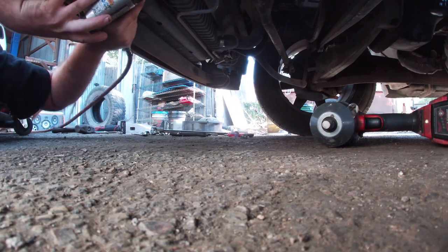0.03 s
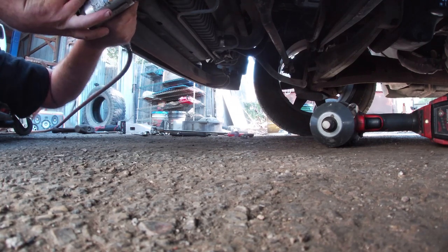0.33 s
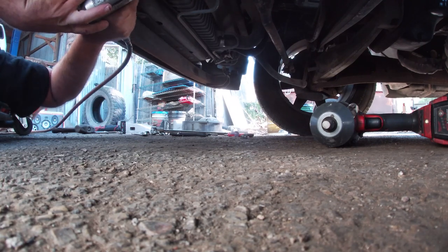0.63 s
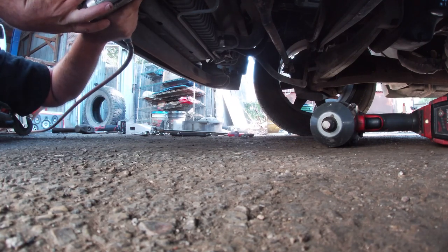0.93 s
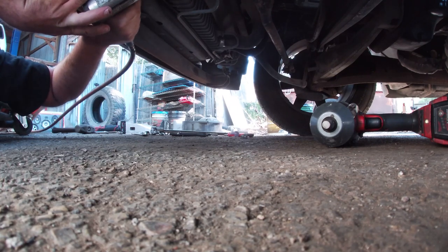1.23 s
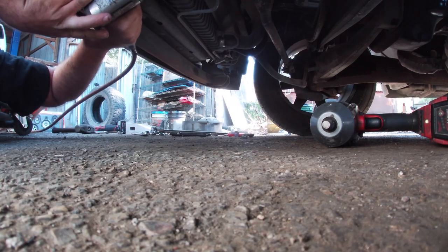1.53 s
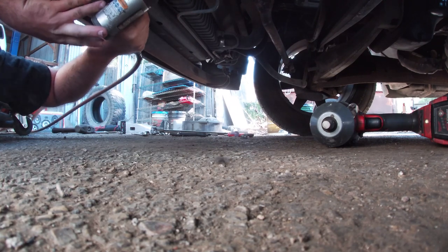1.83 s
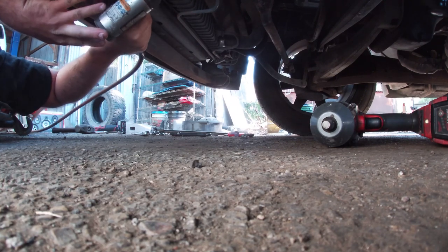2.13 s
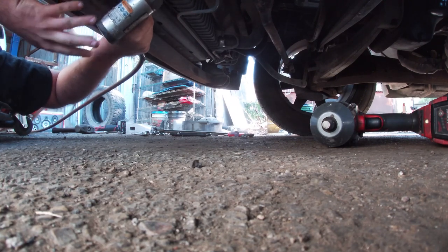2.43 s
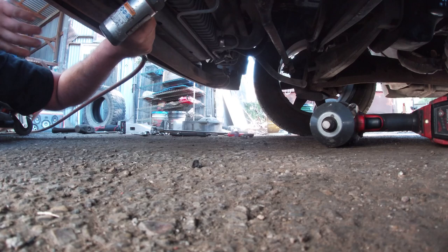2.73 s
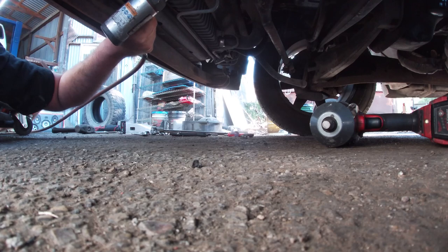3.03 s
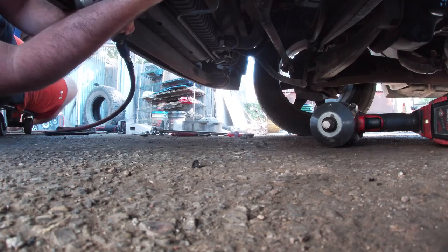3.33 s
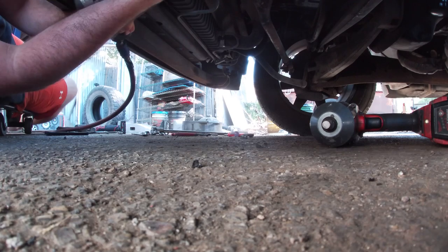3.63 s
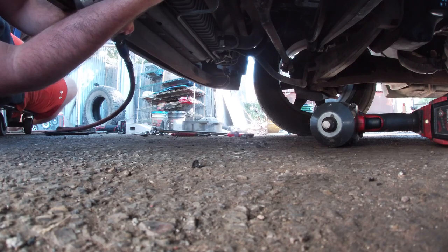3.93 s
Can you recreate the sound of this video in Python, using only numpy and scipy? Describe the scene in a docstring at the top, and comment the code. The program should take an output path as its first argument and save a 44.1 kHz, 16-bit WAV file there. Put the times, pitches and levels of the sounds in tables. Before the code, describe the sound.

Close up in a quiet workshop yard, an air hammer stutters four times with steel clanks and whistling air, then hammers without a break. Finally it presses into a car's underbody, losing the whistle and clattering faster.

```python
"""Under a car in a workshop yard, microphone on the ground, close to an air hammer.
Four short pulls of the trigger, then a long run. Each piston stroke blows a blast of air with a falling
whistle, then a return puff; around the short pulls the steel clanks. Late in the run the tool is pushed
up into the underbody: the whistle ends and the strokes become a faster, denser rattle."""
import sys
import numpy as np
from scipy import signal
from scipy.fft import rfft, irfft, next_fast_len
from scipy.io import wavfile
from scipy.ndimage import uniform_filter1d, minimum_filter1d, map_coordinates

SR = 44100
rng = np.random.default_rng(int(sys.argv[2]) if len(sys.argv) > 2 else 0)


def to_wav(s):
    """Save 16-bit WAV."""
    ch = np.atleast_2d(s).T  # columns
    pcm = np.round(np.clip(ch, -1, 1) * 32767)  # PCM
    wavfile.write(sys.argv[1], SR, pcm.astype(np.int16))


N = 176400
T = np.arange(N) / SR
AGE = T[:SR // 4]  # time since a stroke began [s]
PRESSED_S = 3.11  # the tool is pushed into the underbody
RETURN_LAG_S, SCATTER_DB = 0.01067, 0.66  # piston's return; spread between strokes
# modes of the car's panels (frequency [Hz], level [dB], t60 [s])
PANELS = [(137.6, 0, 0.5), (237, 5.5, 0.43), (355, -6, 0.35), (705, -4.5, 0.55), (955, -7, 0.65),
          (1190, -4, .3), (1470, -9, .7)]


def long_run():
    """Times and levels of the piston's strokes while the trigger is held."""
    # piston speed (time [s], rate [strokes/s])
    rate = [(1.623, 36.1), (1.9, 35.6), (2.05, 35.15), (2.35, 34.85), (2.55, 35.55), (2.72, 35.1),
            (2.85, 35.55), (3.1, 35.75), (3.12, 39.6), (3.6, 41), (4, 41.4)]
    t = T[T >= rate[0][0]]
    cycles = np.cumsum(at(rate, t)) / SR
    times = np.interp(np.arange(int(cycles[-1]) + 1), cycles, t)
    return times, SCATTER_DB * rng.standard_normal(len(times))


def exhaust(times, levels):
    """Each free stroke vents a blast and a return puff; both hiss and push the air under the car."""
    # strokes of the short pulls (time [s], blast [dB], return puff [dB], whistle [dB])
    pulls = [(0.5769, 1.5, -9, -13.5), (0.6169, -3, -25, -5), (0.8023, 1, 2.5, 2), (0.8404, 2.5, -5, 2.5),
             (.868, 2.5, -5, -4), (0.894, 1, -2.5, 3), (1.0894, -4, 11, -1), (1.1275, 2.5, 5, 1.5),
             (1.156, 3.5, -1, 0), (1.182, 3, -5, 3.5), (1.214, -9, -8, 1), (1.352, -1, 6, -3),
             (1.385, 4, 4, 3), (1.4124, 5.5, 3, 3), (1.4423, 3, -6, 0), (1.469, -2.5, -4.5, 0),
             (1.59, 1.5, 3.5, 0)]
    # spectra of blast, return puff and air leaking past the piston (frequency [Hz], density [dB])
    blast_spectrum = [(20, 4.5), (230, -3), (500, -14.5), (1100, -17), (2000, -20.5), (4300, -28.5),
                      (6500, -14), (9500, -20.5), (13000, -39)]
    return_spectrum = [(20, 3.5), (280, -6.5), (550, -21), (1200, -17.5), (2200, -27.5), (4500, -23.5),
                       (7000, -14.5), (10000, -26), (15500, -28.5)]
    hiss_spectrum = [(1800, -34), (2900, 0.5), (4800, -7.5), (7500, -11)]
    # strength of the leak (time [s], level [dB])
    hiss_level = [(.6, -34), (1.6, -24), (2.5, -36.5)]
    # modes of the air under the car (frequency [Hz], level [dB], t60 [s])
    cavity = [(69.5, -6.5, 0.08), (151.4, 0.5, 0.042), (203.5, -3.5, 0.043)]
    # the whistle's settled pitch (time [s], frequency [Hz])
    whistle_pitch = [(.6, 6300), (.85, 5690), (1.65, 5665), (2.2, 5486)]
    held = [(t, db, db, db) for t, db in zip(times, levels)]
    s, blast_db, return_db, whistle_db = np.transpose(pulls + held)
    rested = np.diff(s, prepend=0) > .05  # after a rest: a later return and a higher whistle
    back = s + np.where(rested, .015, RETURN_LAG_S) + .0007 * rng.standard_normal(len(s))
    blast = puffs(s + .00041, blast_db - 12.5, swell(attack_s=.0005, hold_s=.005, t60=.053),
                  blast_spectrum)
    puff = puffs(back, return_db - 16, swell(attack_s=.00019, hold_s=.0033, t60=.057), return_spectrum)
    leaks = np.concatenate([s, back]) + .0038
    hiss = puffs(leaks, at(hiss_level, leaks), swell(attack_s=.00054, hold_s=.0016, t60=.048),
                 hiss_spectrum)
    push = rings(s + .0016, blast_db - 13.5, cavity, detune=.082)
    push += rings(back, return_db - 11, cavity, detune=.044)
    whistle = whistles(s, whistle_db, at(whistle_pitch, s) + 496 * rested)
    air = shocks(s, blast_db) + blast + puff + hiss + push + whistle
    return air + rings(s, blast_db - 40, PANELS, detune=.0066)


def shocks(times, levels):
    """The exhaust port opens with a pop that falls in pitch: the hard front of each blast."""
    out, shape = np.zeros(N), swell(attack_s=.00043, hold_s=.00079, t60=.024)
    fall_hz = 331 + 1127 * np.exp(-AGE / .0014)
    for s, db in zip(times, levels):
        pitch = fall_hz * (1 + .1 * rng.standard_normal())
        add(out, s - .0003, amp(db - 13) * shape * tone(pitch))
    return out


def whistles(times, levels, pitches):
    """A whistle drops onto its pitch with each blast, then lifts and wavers as the air runs out."""
    # the whistle lingering under the car (frequency [Hz], density [dB])
    echo_spectrum = [(4900, -38), (5800, -21), (6800, -42)]
    out, shape = np.zeros(N), swell(attack_s=.0004, hold_s=.0035, t60=.048)
    lift_s, lift_width_s = .0104, .00202
    drop_hz = 2530 * np.exp(-AGE / .000986)
    for s, db, hz in zip(times, levels, pitches):
        late, size = rng.standard_normal(2)
        wander = map_coordinates(rng.standard_normal(128), [AGE * 500])
        waver_hz = 90 * wander * np.minimum(AGE / lift_s, 1.5)
        lift_hz = 422 * np.exp(-((AGE - lift_s * (1 + .04 * late)) / lift_width_s) ** 2)
        pitch = hz + drop_hz + lift_hz + waver_hz
        add(out, s + .0001, amp(db - 15 + SCATTER_DB * size) * shape * tone(pitch))
    add(out, 2.7, amp(-16) * chirp(5900, glide_hz_per_s=48000, length_s=.013))  # one upward squeak
    linger = swell(attack_s=.001, hold_s=.0027, t60=.14)
    return out + puffs(times + lift_s, levels - 28, linger, echo_spectrum)


def rattle(times, levels):
    """Pressed home, the chisel chatters unevenly, out and back, and each stroke shakes the underbody."""
    # spectra of the underbody's clatter and the chisel's chatter (frequency [Hz], density [dB])
    underbody = [(20, 2.5), (200, -3.5), (430, -8), (780, -18), (1000, -15), (1900, -24), (6000, -55)]
    chisel = [(400, -19), (1300, 4), (4200, -3), (6600, 4), (10000, -5.5), (14000, -8)]
    late, size = rng.standard_normal((len(times), 2)).T
    s = np.append(PRESSED_S, times - .00174 + .0011 * late)
    db = np.append(-3, levels + 1.1 * size)
    clatter = puffs(s, db - 13.5, swell(attack_s=.00084, hold_s=.01, t60=.2), underbody)
    snap = swell(attack_s=.00025, hold_s=.0048, t60=.081)
    chatter = puffs(s, db - 22, snap, chisel) + puffs(s + RETURN_LAG_S, db - 27.5, snap, chisel)
    return clatter + chatter + rings(s, db - 35, PANELS, detune=.0053)


def clanks():
    """Steel meets steel: a bright crash, a short ring, a thud where the chisel bites; panels sing on."""
    # piston and chisel clanking (time [s], level [dB])
    hits = [(0.5794, -15.5), (0.6182, -19), (0.689, -19.5), (0.8233, -17.5), (0.934, -21), (1.001, -24.5),
            (1.216, -20.5), (1.278, -23), (1.53, -22.5)]
    # spectrum of the crash (frequency [Hz], density [dB])
    crash_spectrum = [(300, 8.5), (1200, -2), (4500, -7), (6300, -3.5), (8000, -10), (9800, -1),
                      (12000, -17), (16000, -36)]
    # the chisel landing squarely on the work (time [s], level [dB])
    bites = [(.578, -5.5), (.842, -12), (.869, -22.5), (.896, -15)]
    # modes of the thud and of the steel (frequency [Hz], level [dB], t60 [s])
    thud_modes = [(123, -2, 0.06), (330, 3, 0.033), (736, -0.5, 0.033), (1106, -10.5, 0.034)]
    steel_modes = [(9010, 11, 0.021)]
    s, db = np.transpose(hits)
    crash = puffs(s, db, swell(attack_s=.00014, hold_s=.0029, t60=.066), crash_spectrum)
    thud = rings(*np.transpose(bites), thud_modes, detune=.026)
    steel = rings(s, db - 6, steel_modes, detune=.011)
    return crash + thud + steel + rings(s, db - 14.5, PANELS, detune=.0048)


def handling():
    """The tool ticks in the hand, then the trigger knocks dully as it is pressed."""
    # modes of the knock (frequency [Hz], level [dB], t60 [s])
    knock_modes = [(370, 3.5, 0.086), (700, -12, 0.036)]
    # handling ticks (time [s], level [dB], centre [Hz])
    ticks = [(0.042, -35, 4470), (0.059, -30.5, 1290), (.192, -38.5, 2600), (0.332, -37, 8800)]
    out = rings([.535], [-18], knock_modes, detune=.0032)
    shape = swell(attack_s=.00011, hold_s=.0012, t60=.1)
    for s, db, hz in ticks:
        out += puffs([s], [db], shape, [(hz / 5, -14), (hz, 0), (hz * 6, -38)])
    return out


def yard(x):
    """Reflections off the ground, the car and the workshop walls, 5 ms behind the direct sound."""
    # reverberation of the yard (frequency [Hz], t60 [s])
    decay = [(100, 0.37), (600, 0.73), (2000, 0.22), (9000, 0.16)]
    hz, t, bands = signal.stft(rng.standard_normal(SR // 2), SR, nperseg=256)
    fade = amp(-60 * t / along(decay, hz)[:, None])
    tail = signal.istft(bands * fade, SR, nperseg=256)[1]
    return signal.fftconvolve(np.pad(x, (SR // 200, 0)), tail / np.linalg.norm(tail))[:N]


def background():
    """Yard ambience behind the tool: steady noise, a low hum and two faint chirps."""
    # spectrum of the ambience (frequency [Hz], density [dB])
    ambience = [(70, 5), (600, -16.5), (2800, -27.5), (4300, -31.5), (10500, -35), (15000, -55)]
    # falling chirps (time [s], starting pitch [Hz])
    chirps = [(.292, 3930), (0.359, 3000)]
    hum = amp(-41) * np.sin(2 * np.pi * 62.7 * T)
    out = amp(-39.5) * noise(ambience) + hum
    for s, hz in chirps:
        add(out, s, amp(-49.5) * chirp(hz, glide_hz_per_s=-12000, length_s=.02))
    return out


def puffs(times, levels, shape, spectrum):
    """A burst of coloured noise at each time; overlapping bursts add in power."""
    power = np.zeros(N)
    for s, db in zip(times, levels):
        add(power, s, (amp(db) * shape) ** 2)
    return np.sqrt(power) * noise(spectrum)


def rings(times, levels, modes, detune):
    """Each blow rings the modes anew, a little different in level and pitch."""
    out, t = np.zeros(N), T[:SR // 3]
    hz, mode_db, t60 = np.transpose(modes)[..., None]
    fade = amp(mode_db - 60 * t / t60)
    for s, db in zip(times, levels):
        size, bend = rng.standard_normal((2, len(modes), 1))
        phase = 2 * np.pi * hz * (1 + detune * bend) * t
        add(out, s, (amp(db + .92 * size) * fade * np.sin(phase)).sum(0))
    return out


def chirp(hz, glide_hz_per_s, length_s):
    """A short gliding tone."""
    t = T[T < length_s]
    return np.sin(np.pi * t / length_s) * np.sin(2 * np.pi * (hz + glide_hz_per_s * t / 2) * t)


def tone(hz):
    """A sine that follows a pitch curve."""
    return np.sin(2 * np.pi * np.cumsum(hz) / SR)


def swell(attack_s, hold_s, t60):
    """An envelope of attack, hold and release."""
    return (1 - np.exp(-AGE / attack_s)) * amp(-60 * np.maximum(AGE - hold_s, 0) / t60)


def noise(spectrum):
    """Coloured noise of rms 1."""
    x = filtered(rng.standard_normal(N), lambda hz: amp(along(spectrum, hz)))
    return x / np.sqrt(np.mean(x ** 2) + 1e-20)


def filtered(x, response):
    """x through a frequency response."""
    size = next_fast_len(N + SR // 2)
    return irfft(rfft(x, size) * response(np.fft.rfftfreq(size, 1 / SR)), size)[..., :N]


def add(track, s, sound):
    """Mix a sound in at time s."""
    part = track[max(round(s * SR), 0):][:len(sound)]
    part += sound[:len(part)]


def along(points, hz):
    """A curve read on a log frequency axis."""
    knots_hz, values = np.transpose(points)
    return np.interp(np.log(hz + 1), np.log(knots_hz + 1), values)


def at(points, s):
    """A control curve read at times s."""
    return np.interp(s, *np.transpose(points))


def amp(db):
    """Decibels to amplitude."""
    return 10 ** (np.asarray(db) / 20)


def scene():
    """The hammer close up, its echo and the quiet yard, in mono on both channels."""
    times, levels = long_run()
    free = times < PRESSED_S
    tool = exhaust(times[free], levels[free]) + rattle(times[~free], levels[~free])
    tool += clanks() + handling()
    mono = tool + amp(-13.5) * yard(tool) + background()
    return np.array([mono, mono])


def record(dry):
    """The treble dulls as the hammering goes on, its top edge twice as much; a limiter catches peaks."""
    # gain of each of the two treble shelves (time [s], gain [dB])
    treble = [(.65, 0.5), (.85, -6), (1.1, -15), (1.4, -19.5), (3, -24.5)]
    low_cut_hz, shelves_hz, top_hz = 15, (6030, 13000), 15900
    x = filtered(dry, lambda hz: 1j * hz / (1j * hz + low_cut_hz))
    for corner in shelves_hz:
        low = filtered(x, lambda hz: 1 / (1 + (hz / corner) ** 24))
        x = low + amp(at(treble, T)) * (x - low)
    ceiling, width = .9, int(.003 * SR)
    needed_gain = ceiling / np.maximum(np.abs(x), ceiling)
    gain = uniform_filter1d(minimum_filter1d(needed_gain, width), width)
    return filtered(x * gain, lambda hz: hz < top_hz)


dry = scene()
out = record(dry)
to_wav(out)
```